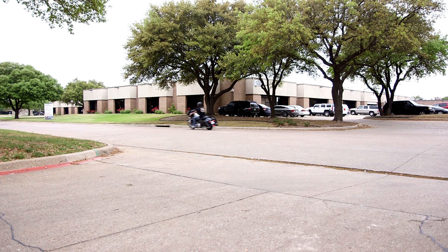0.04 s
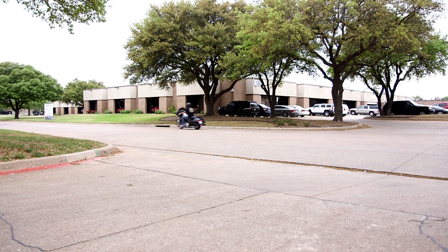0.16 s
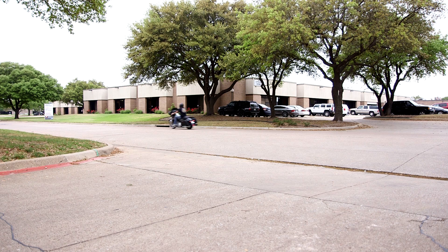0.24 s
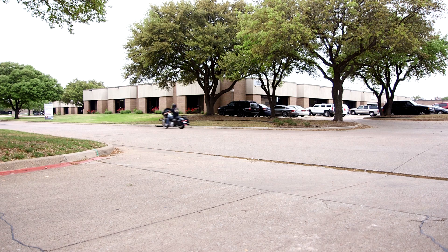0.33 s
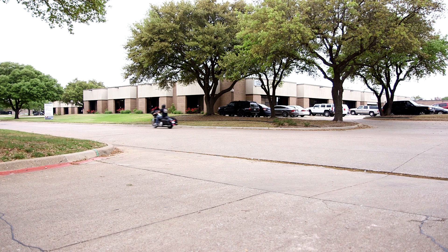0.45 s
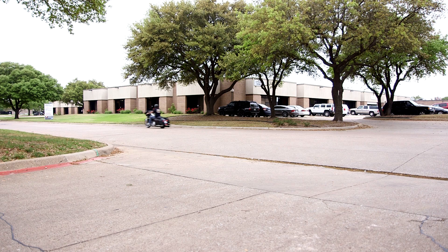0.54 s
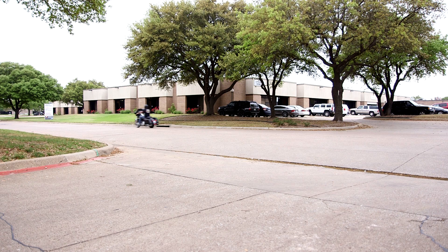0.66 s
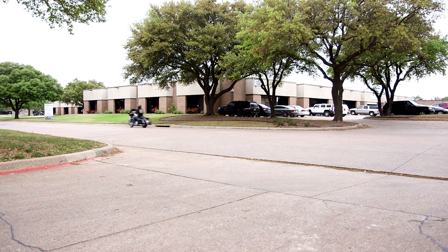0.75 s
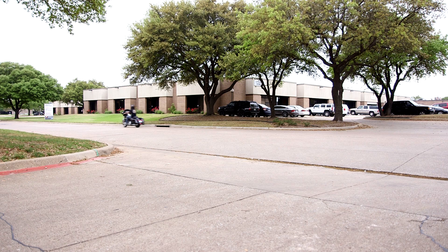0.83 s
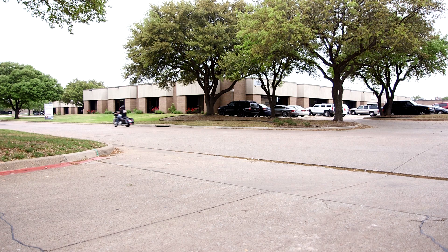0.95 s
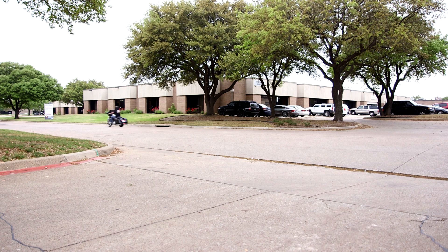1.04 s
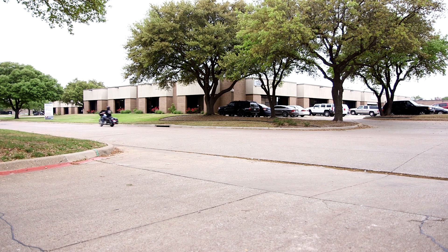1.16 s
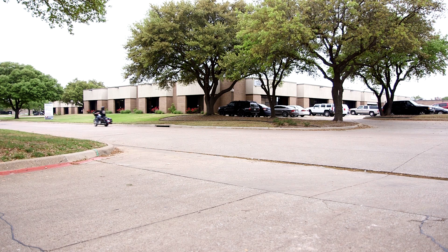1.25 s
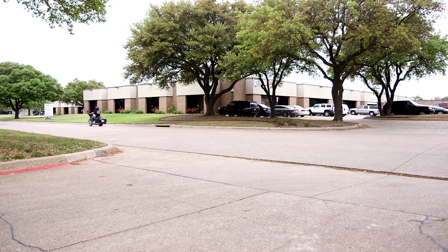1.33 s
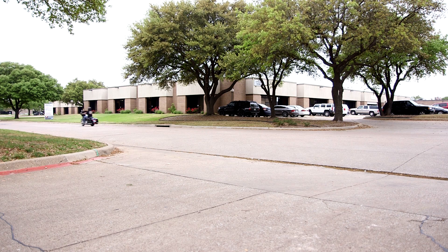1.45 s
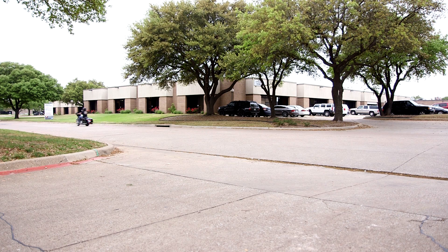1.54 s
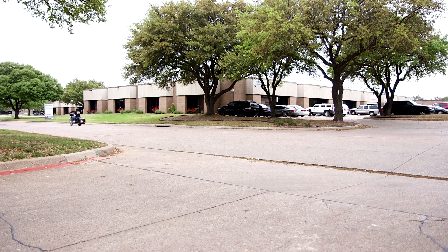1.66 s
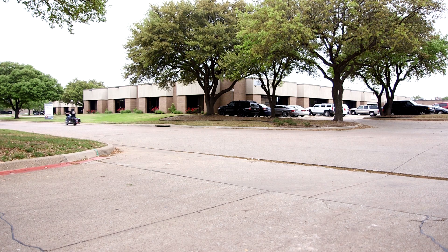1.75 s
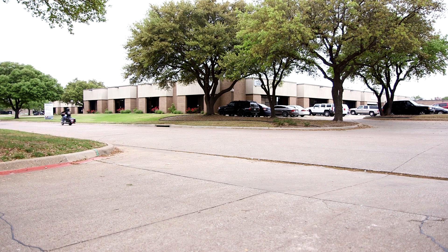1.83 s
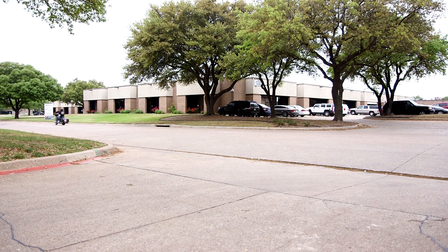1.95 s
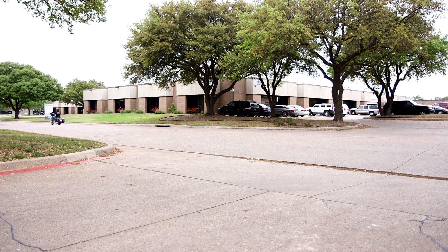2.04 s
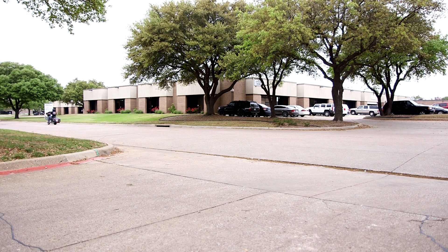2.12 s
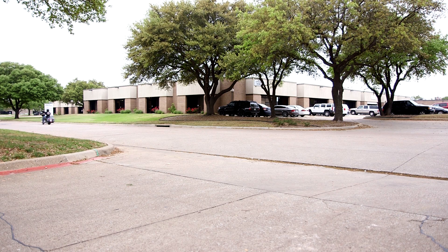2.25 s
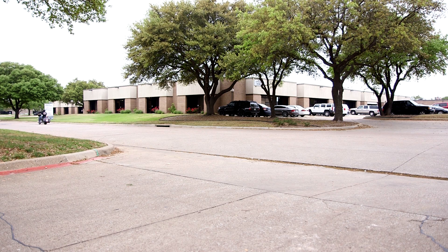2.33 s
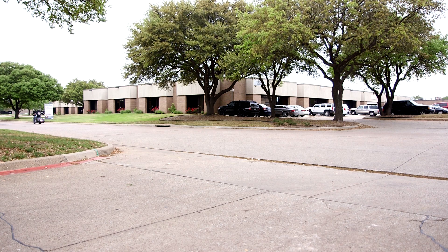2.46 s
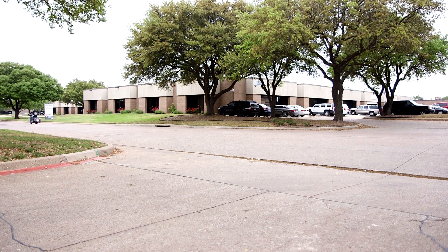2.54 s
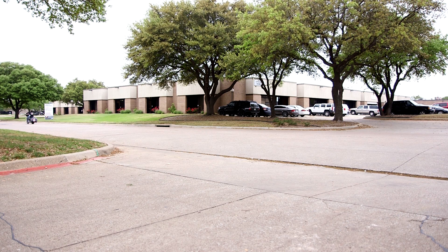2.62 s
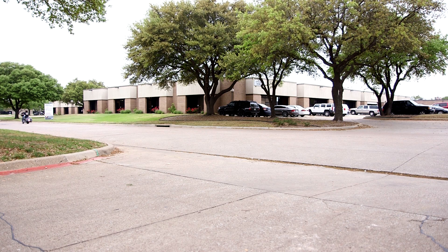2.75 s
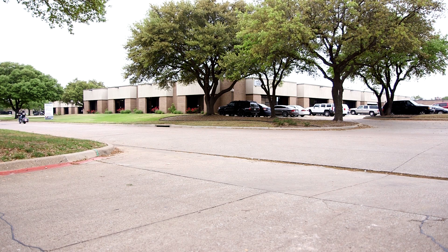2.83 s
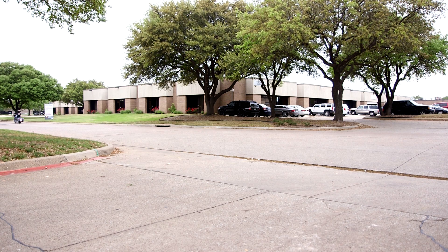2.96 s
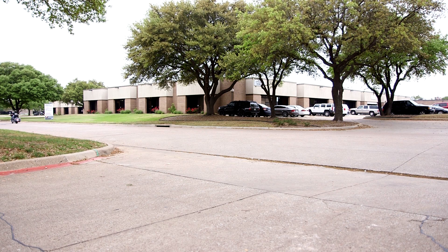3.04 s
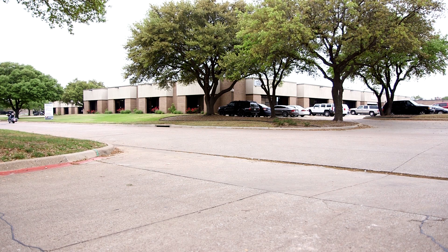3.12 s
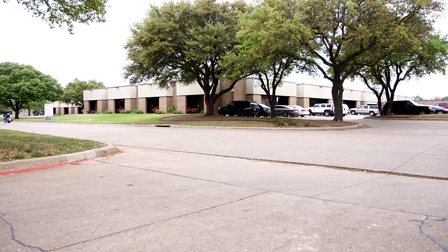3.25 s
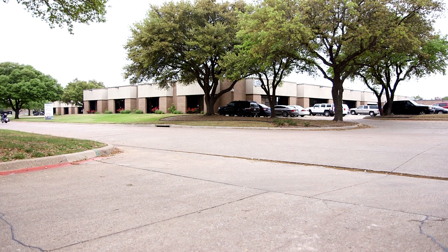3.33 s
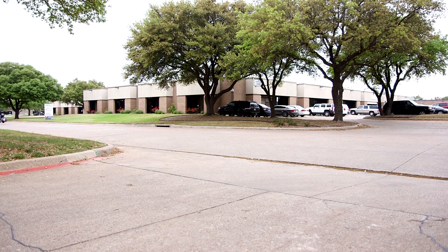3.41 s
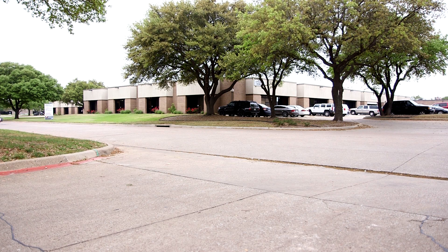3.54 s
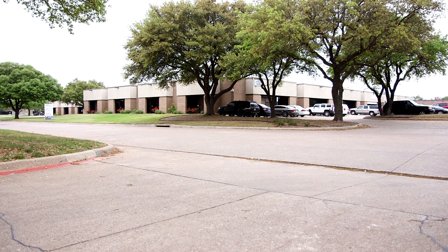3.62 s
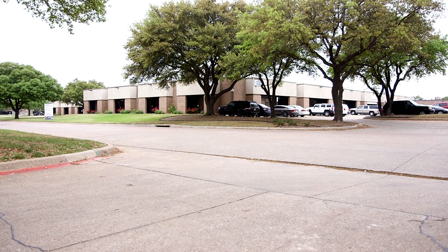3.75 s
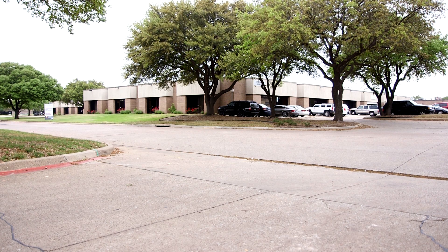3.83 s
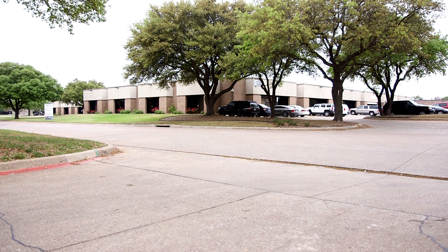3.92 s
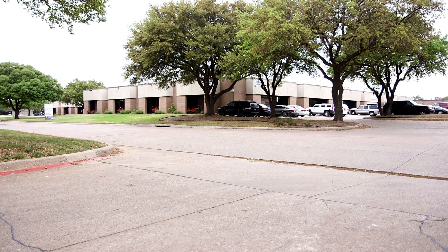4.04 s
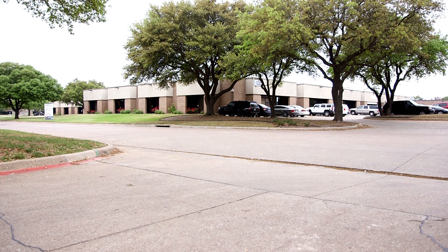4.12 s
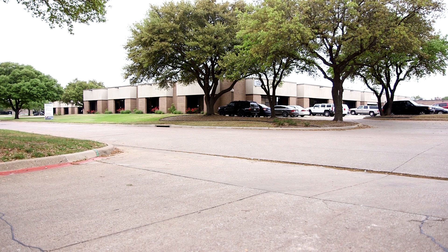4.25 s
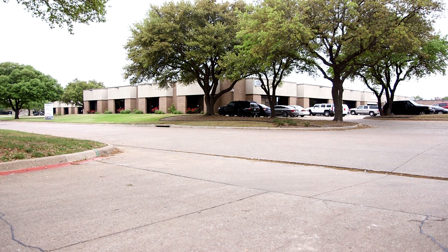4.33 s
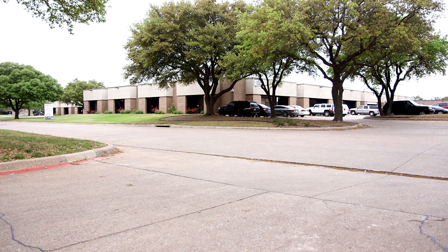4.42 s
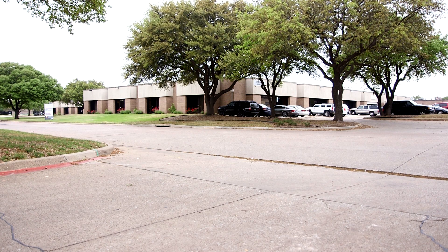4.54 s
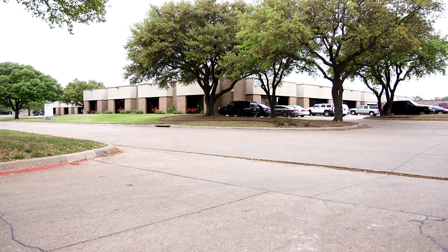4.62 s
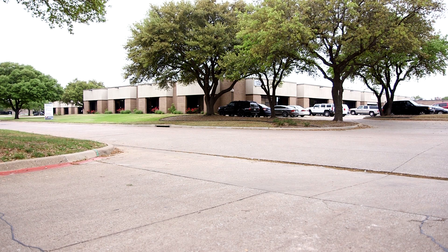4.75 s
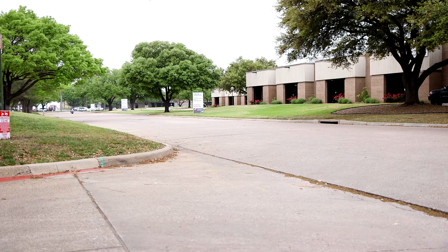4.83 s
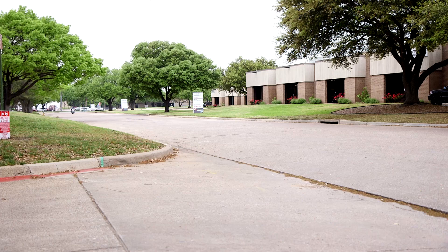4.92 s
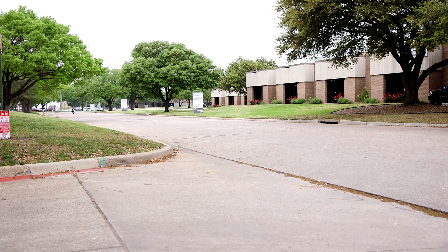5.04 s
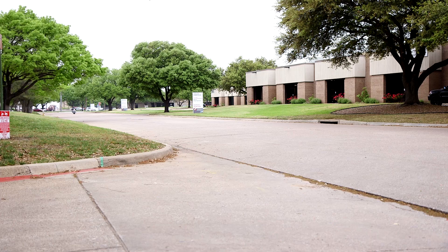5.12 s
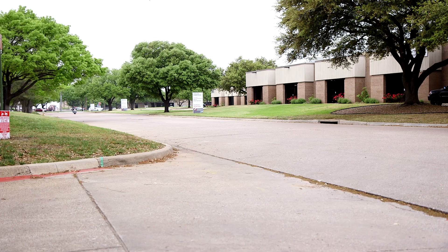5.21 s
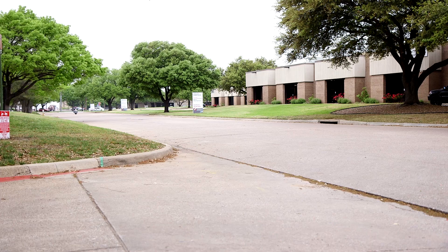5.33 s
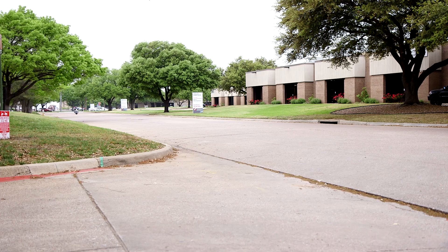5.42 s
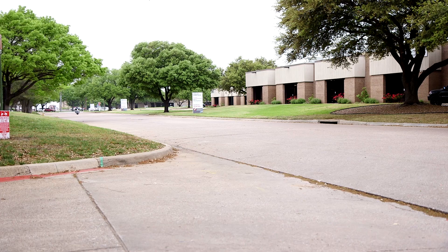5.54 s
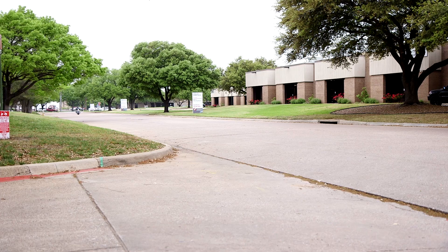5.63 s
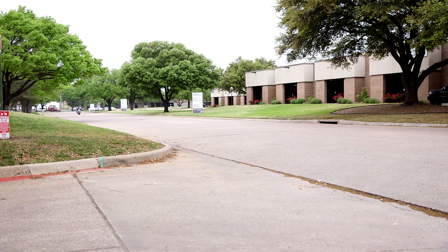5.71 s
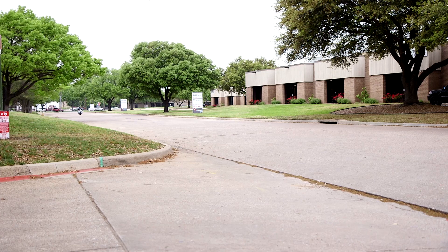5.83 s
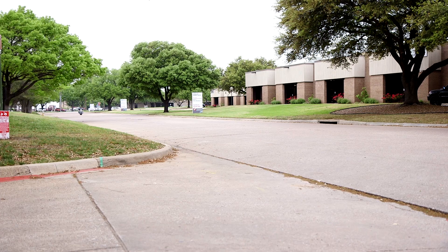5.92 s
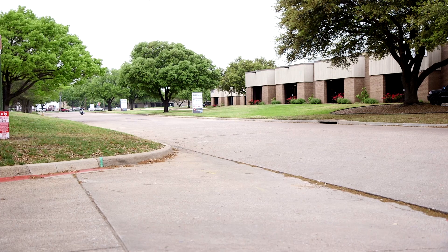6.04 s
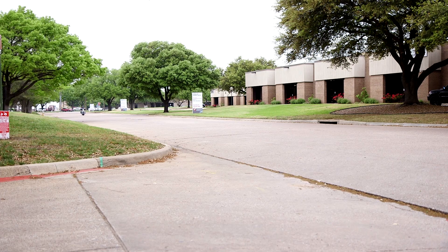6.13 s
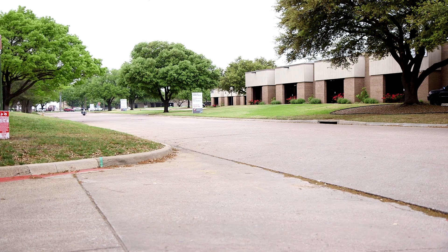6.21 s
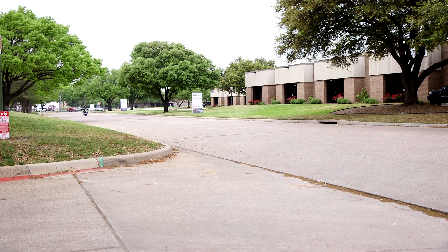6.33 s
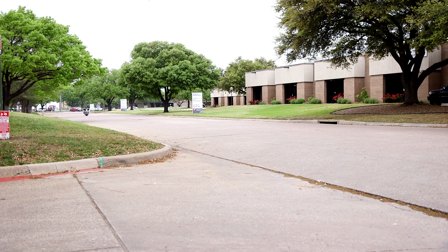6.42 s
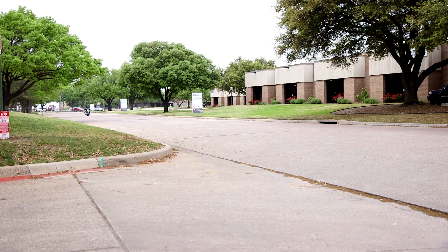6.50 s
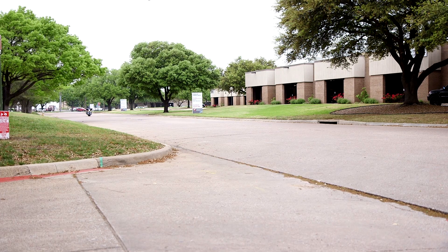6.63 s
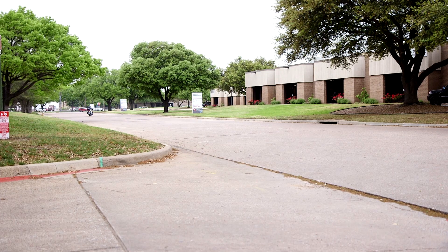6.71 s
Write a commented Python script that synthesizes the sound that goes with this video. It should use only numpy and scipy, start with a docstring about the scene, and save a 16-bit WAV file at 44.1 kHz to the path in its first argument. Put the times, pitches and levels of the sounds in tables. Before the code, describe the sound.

A big twin-cylinder motorcycle accelerates past with a deep, thumping, rasping exhaust. It shifts gear and winds up again as it moves away, with sharp crackles. Then it coasts with short throttle blips and low pops, and far down the road it opens up into a steady, wavering drone. The microphone stays at the side of an open street, with light echoes and faint distant traffic.

```python
"""An office street: a big V-twin motorcycle with open mufflers pulls away, winds up, shifts, winds up
again and coasts with blips and afterfire. Then, far down the road amid traffic, it opens up on its way
back, its drone beating slowly against a building's echo. Each firing thumps the exhaust pipes and spits
gas; throttle, engine speed and distance set the levels; trees and walls scatter the sound."""
import sys
import numpy as np
from scipy import signal
from scipy.fft import rfft, irfft
from scipy.io import wavfile
from scipy.ndimage import uniform_filter1d

SR = 44100
rng = np.random.default_rng(int(sys.argv[2]) if len(sys.argv) > 2 else 0)


def materialize(psi):
    """Save the field psi as 16-bit PCM at rate SR to the path in sys.argv[1].

    A 1-D psi becomes a single channel; in a 2-D psi each row is a channel.
    """
    bounded = np.clip(np.atleast_2d(psi).T, -1, 1)
    quanta = np.round(bounded * 32767).astype(np.int16)
    wavfile.write(sys.argv[1], SR, quanta)


N = 298557
TIME_S = np.arange(N) / SR

# engine speed through two gears and the coast: (time [s], four-stroke cycle rate [Hz])
SPEED_LEAVING = [(0, 20.64), (1.24, 25.12), (1.42, 21.44), (1.56, 17.31), (1.7, 19.1), (1.83, 17.74),
                 (1.97, 18.73), (2.3, 19.31), (3.1, 22.76), (3.88, 25.67), (4.05, 21.96), (4.3, 18.87),
                 (5.3, 20.09)]


def from_db(db):
    return 10 ** (np.asarray(db) / 20)


def rms_one(x):
    return x / np.sqrt(np.mean(x ** 2) + 1e-20)


def in_time(rows):
    """Columns of a curve at every sample."""
    time_s, *columns = np.transpose(rows)
    return [np.interp(TIME_S, time_s, column) for column in columns]


def swell(at_s, sigma_s):
    return np.exp(-.5 * ((TIME_S - at_s) / sigma_s) ** 2)


def evened(x, samples=4400):
    """Running level held at 1; single firings keep their shape."""
    power = uniform_filter1d(uniform_filter1d(x ** 2, samples), samples)
    return x / np.sqrt(np.abs(power) + 1e-12)


def butter(x, hz, kind):
    return signal.sosfilt(signal.butter(2, hz, kind, fs=SR, output="sos"), x + 1e-18)


def noise(spectrum):
    """Coloured noise, rms 1."""
    hz, db = np.transpose(spectrum)
    bins_hz = np.arange(N // 2 + 1) * SR / N
    gain = from_db(np.interp(np.log(bins_hz + 1), np.log(hz), db))
    return rms_one(irfft(rfft(rng.standard_normal(N)) * gain, N))


def decay(x, tau_s):
    """Each click becomes an exponential tail."""
    return signal.lfilter([1], [1, -np.exp(-1 / (tau_s * SR))], x + 1e-18)


def resonate(x, modes):
    """Parallel resonances: (frequency [Hz], width [Hz], gain [dB])."""
    out = 0
    for hz, width_hz, db in modes:
        r = np.exp(-np.pi * width_hz / SR)
        poles = [1, -2 * r * np.cos(2 * np.pi * hz / SR), r * r]
        out += from_db(db) * (1 - r * r) / 2 * signal.lfilter([1, 0, -1], poles, x + 1e-18)
    return out


def gliding(x, hz, width_hz):
    """A steep resonance whose centre moves."""
    turn = np.exp(2j * np.pi * np.cumsum(hz) / SR)
    r = np.exp(-np.pi * width_hz / SR)
    return np.real(turn * signal.lfilter([1 - r], [1, -2 * r, r * r], x / turn + 1e-18))


def scattered(x, wet_db, t60_s):
    """Trees and walls add a diffuse tail."""
    t = TIME_S[:SR]
    tail = rng.standard_normal(SR) * from_db(-60 * t / t60_s) * (t > .015)
    return x + from_db(wet_db) * signal.fftconvolve(x, tail / np.linalg.norm(tail))[:N]


def throttle(empty_s=.029):
    """Opening 0-1: each twist rises, holds and dies as the pipes empty."""
    # pulls and blips: (opens [s], shuts [s], opening [0-1], rise [s])
    twists = [(-.2, 1.48, 1, .04), (1.6, 3.88, 1, .04), (3.975, 4.03, .6, .012), (4.36, 4.47, .8, .03),
              (4.66, 4.83, .9, .07), (4.94, 5.65, .5, .03), (5.5, 6.9, 1, .14)]
    return np.max([opening * (1 - np.exp(-np.maximum(TIME_S - opens_s, 0) / rise_s))
                   * np.exp(-np.maximum(TIME_S - shuts_s, 0) / empty_s)
                   for opens_s, shuts_s, opening, rise_s in twists], axis=0)


def firings(speed, start_cycle, uneven, rear_db, spread_db, jitter_s):
    """Clicks of two cylinders, 315 degrees apart; uneven (0-1) scales spread and jitter."""
    cycles = start_cycle + np.cumsum(in_time(speed)[0]) / SR
    clicks = np.zeros((2, N))
    for cylinder, offset, db in zip(clicks, (0, 315 / 720), (0, rear_db)):
        due = np.flatnonzero(np.diff(np.floor(cycles - offset)) > 0)
        size, late = rng.standard_normal((len(due), 2)).T
        fired = np.clip(due + late * uneven[due] * jitter_s * SR, 0, N - 1).astype(int)
        cylinder[fired] = from_db(db + spread_db * uneven[due] * np.minimum(size, 1))
    return clicks


def engine(shut, far, pulling=.016, coasting=.45, settle_s=.11):
    """Firings of the departure fade into those of the return; uneven off load."""
    # engine speed far away: (time [s], cycle rate [Hz])
    speed_returning = [(4.7, 28.31), (5.2, 28.53), (5.5, 29.08), (5.75, 29.22), (6.1, 28.83), (6.45, 28.7),
                       (6.77, 28.63)]
    uneven = pulling + (coasting - pulling) * decay(shut, settle_s) / (settle_s * SR)
    leaving = firings(SPEED_LEAVING, -.324, uneven, rear_db=0, spread_db=4.5, jitter_s=.0015)
    returning = firings(speed_returning, .0974, uneven, rear_db=-4, spread_db=-9, jitter_s=.0013)
    leaving[1, 0] = .8  # already running
    return np.sqrt(1 - far) * leaving, np.sqrt(far) * returning


def turbulent(clicks, rough=.007):
    """A puff of turbulence follows each pulse."""
    return clicks + rough * decay(clicks, .014) * rng.standard_normal(N)


def pipes(thumps, direction):
    """Each cylinder's blow-down rings its own pipe, heard from one direction."""
    # pipe modes: (frequency [Hz], width [Hz], then signed gain [linear] for each direction:
    # 0 side-on, 1 turning away, 2 rear quarter, 3 behind, 4 head-on)
    front_modes = [(107.0, 16.0, -2.0, -1.2, -1.01, 0.54, -1.62),
                   (113.0, 16.0, 0.36, 0.61, -0.42, -1.48, 1.6),
                   (148.0, 16.0, 0.45, -0.33, 0.19, -0.15, -0.85),
                   (174.0, 63.0, 0.02, 0.29, -0.11, 0.11, 0.09),
                   (252.0, 70.0, 0.18, -0.06, 0.14, 0.05, 0.03),
                   (340.0, 70.0, 0.04, -0.04, 0.07, 0.06, -0.03),
                   (416.0, 24.0, -0.05, 0.05, -0.06, -0.01, -0.02)]
    rear_modes = [(103.0, 26.0, -0.41, -0.93, -0.53, 0.27, -0.25),
                  (144.0, 70.0, -0.31, -0.1, -0.21, -0.46, -0.1),
                  (185.0, 25.0, 0.67, 0.22, 0.2, 0.42, 0.02), (246.0, 39.0, 0.04, 0.24, 0.06, 0.17, 0.07),
                  (282.0, 16.0, 0.31, -0.11, 0.06, -0.15, -0.04),
                  (306.0, 70.0, 0.12, 0.08, 0.06, 0.03, 0.05),
                  (396.0, 66.0, 0.07, -0.09, 0.04, 0.025, -0.03)]
    return sum(gains[direction] * resonate(cylinder, [(hz, width_hz, 0)])
               for cylinder, modes in zip(thumps, (front_modes, rear_modes))
               for hz, width_hz, *gains in modes)


def chambers(going, coming, shut):
    """Mufflers ring on: hollow as the bike swings away, rumbling shut or labouring, howling head-on."""
    # chamber modes: (frequency [Hz], width [Hz], gain [dB])
    hollow = [(404.9, 8.3, -27)]
    rumble = [(76.7, 8.2, -2)]
    howl = [(293, 41, -31), (350.6, 22, -26.5), (478, 53, -32)]
    labour = 1.1 * swell(1.75, .29)
    rung = resonate(going * from_db(15.5 * swell(2.07, .3)), hollow)
    rung += resonate(going * np.maximum(shut, labour), rumble)
    rung += resonate(coming, howl)
    return scattered(rung, wet_db=-2, t60_s=.3)


def boom(leaving, returning, shut, shifting, gain_db=46, duck_db=-3):
    """The deep pipe note changes with heading; the wall's echo sweeps notches through it."""
    # thump strength from load and distance: (time [s], relative level [dB])
    push = [(0, -4.5), (1.24, -6), (1.47, -6), (1.52, -6.5), (1.59, -10.5), (1.65, -5), (1.8, -3.5),
            (2.0, -5.5), (3.87, -5.5), (3.92, -12.5), (4.28, -16), (4.45, -7.5), (4.6, -15), (4.78, -6),
            (4.92, -10.5), (5.2, -9), (5.53, -10), (5.78, -5.5), (6.1, -6), (6.77, -4)]
    # the bike swings away, then turns: (time [s], direction [0 side-on to 3 behind])
    headings = [(1.45, 0), (1.62, 1), (2.1, 1), (2.9, 2), (3.75, 3), (4.1, 3), (4.45, 1)]
    # sound arriving via trees and walls: (time [s], share [0-1])
    indirect = [(3.9, 0), (4.7, 0.61), (5.2, 0.4), (5.6, 0.28)]
    # building echo: (time [s], delay [ms], strength [0-1])
    wall = [(4.9, 4.2, 0), (5.2, 4.18, .41), (5.5, 4.13, .34), (5.8, 4.96, .53), (6.1, 7.29, .38),
            (6.4, 10.31, .48), (6.75, 9.85, .06)]
    drive = from_db(in_time(push)[0] + duck_db * shifting)
    going, coming = turbulent(leaving * drive), turbulent(returning * drive)
    heading, = in_time(headings)
    note = sum(np.maximum(1 - abs(heading - k), 0) * pipes(going, k) for k in range(4))
    note += pipes(coming, direction=4)
    note += chambers(going.sum(axis=0), coming.sum(axis=0), shut)
    note = butter(butter(note, 65, "high"), 520, "low")
    note = signal.sosfiltfilt(signal.butter(4, 560, fs=SR, output="sos"), note)
    share, = in_time(indirect)
    diffuse = scattered(note, wet_db=0, t60_s=.4) - note
    note = np.sqrt(1 - share) * note + np.sqrt(share) * diffuse
    delay_ms, strength = in_time(wall)
    echo = strength * np.interp(TIME_S - delay_ms / 1000, TIME_S, note)
    return from_db(gain_db) * (note + echo)


def bark(clicks, trim_db=-1):
    """Steep pulse fronts ring two wandering upper pipe modes."""
    # modes: (time [s], lower level [dB], lower pitch [Hz], upper level [dB], upper pitch [Hz])
    modes = [(0.0, -37, 706, -35, 930), (0.14, -33, 663, -35, 890), (0.81, -32.5, 700, -35, 912.5),
             (1.44, -44, 676, -41.5, 910), (1.54, -43, 650, -45, 950), (1.58, -56, 656, -62, 927),
             (1.68, -39.5, 704, -45.5, 923), (2.13, -43.5, 675, -45.5, 890), (2.33, -45, 667, -59, 900),
             (2.38, -42.5, 670, -43.5, 883), (3.41, -49, 680, -54, 930), (3.68, -49, 657, -44, 910),
             (3.87, -46, 680, -46, 865), (3.93, -63, 675, -70, 947), (4.02, -51, 648, -58, 919),
             (4.3, -62, 685, -64, 928)]
    fronts = scattered(turbulent(clicks, rough=.004), wet_db=-2, t60_s=.18)
    low_db, low_hz, high_db, high_hz = in_time(modes)
    return sum(from_db(trim_db + db) * evened(gliding(fronts, hz, width_hz=153))
               for db, hz in ((low_db, low_hz), (high_db, high_hz)))


def cracks(clicks, tau_s=.0008, spread_db=2.5):
    """A tearing burst per firing, favouring other modes each time."""
    # pipe mouth: (frequency [Hz], width [Hz], gain [dB])
    modes = [(1820, 110, 7), (2930, 200, 7), (4460, 1030, 9.5), (5270, 1200, -18), (7200, 1700, -7),
             (11500, 3500, -9.5)]
    out = 0
    for mode in modes:
        strikes = clicks * from_db(spread_db * np.minimum(rng.standard_normal(N), 1.8))
        envelope = decay(decay(decay(strikes, tau_s), tau_s), tau_s)
        out += resonate(envelope * rng.standard_normal(N), [mode])
    return butter(out, 1300, "high")


def rasp(clicks, shut, far, drone_hz=21.6, drone_width_hz=1.05):
    """Gas rushes out after each firing; its front steepens into a crack."""
    # gas noise: (frequency [Hz], density [dB])
    spectrum = [(300, 0.5), (480, 6), (650, 6), (1000, 3), (1400, -0.5), (2000, -0.5), (2500, -5.5),
                (3300, -7.5), (4400, -4.5), (5600, -10), (8000, -16), (11500, -22), (16000, -42)]
    # brightness as the mufflers swing round: (time [s], treble [2.1 dB steps], crack level [dB])
    aim = [(0, -2.5, -8), (1.25, -1.5, -14), (1.8, 0, -6), (2.42, 2.5, -6.5), (3.1, 4.5, -15.5),
           (3.85, -1.5, -26), (4.25, -4, -23), (4.48, 4, -18), (4.85, 0, -22), (5.15, -9, -36),
           (6.77, -2.5, -15)]
    # distance loss: (time [s], gain [2.5 dB steps])
    path = [(0, -0.5), (.8, 0.5), (1.4, -1.03), (2.15, -4.5), (3.1, -4.5), (3.8, -3.5), (4.3, -7),
            (5.3, -8), (6.77, -7.5)]
    treble, crack_db = in_time(aim)
    rush = noise(spectrum) * (2.84 + rms_one(decay(decay(clicks, .0033), .0033)))
    gas = evened(evened(rush) + from_db(crack_db) * evened(cracks(clicks), samples=9000))
    dull = signal.sosfiltfilt(signal.butter(1, 6000, fs=SR, output="sos"), gas)
    aimed = dull + from_db(2.1 * treble) * (gas - dull)
    # louder where the cycle rate's fifth harmonic meets the pipe resonance
    drone = (1 - far) * np.exp(-.5 * ((in_time(SPEED_LEAVING)[0] - drone_hz) / drone_width_hz) ** 2)
    level_db = -32.5 - 3.5 * shut + 2.5 * in_time(path)[0] + 2 * drone
    return from_db(level_db) * scattered(aimed, wet_db=-11.5, t60_s=.82)


def street_air(level_db=-38):
    """Steady low rush of the street."""
    # air: (frequency [Hz], density [dB])
    spectrum = [(20, -20), (50, 14.5), (100, 8.5), (300, 9.5), (1000, -21.5), (2500, -29.5), (6000, -26),
                (15000, -54)]
    return from_db(level_db) * noise(spectrum)


def snaps(width_hz=1800, trim_db=-.5):
    """The hardest cracks: short bursts ring the pipe mouth."""
    # cracks: (time [s], peak before trim [dB], ring [Hz])
    events = [(0.178, -21.5, 4300), (0.2269, -23, 4030), (0.2713, -20, 4370), (1.752, -26, 4300),
              (1.8023, -29, 4850), (1.9135, -24.5, 4630), (1.9683, -26, 4510), (2.3361, -27, 4640),
              (2.3852, -27.5, 4150), (2.4139, -28, 6100), (2.584, -24.5, 4980), (2.8955, -26.5, 3760),
              (2.9856, -25, 4260), (3.0317, -25, 4990), (3.0935, -25, 4870)]
    out, t = np.zeros(N), TIME_S[:SR // 8]
    for at_s, db, hz in events:
        mode = [(hz, width_hz, 0)]
        burst = t * np.exp(-t / .00081) * rng.standard_normal(len(t))
        rung = resonate(resonate(burst, mode), mode)
        out[int(at_s * SR):][:len(t)] += from_db(trim_db + db) * rung / np.abs(rung).max()
    return out


def gear_change(front_clicks, from_s=1.275, to_s=1.485, level_db=-21.5, sag_hz_per_s=82):
    """The front cylinder booms alone and its note sags. Returns the note and its 0-1 gate."""
    gate = np.clip((TIME_S - from_s) / .01, 0, 1) * np.exp(-np.maximum(TIME_S - to_s, 0) / .036)
    hz = 120 - sag_hz_per_s * np.clip(TIME_S - from_s, 0, .5)
    return -from_db(level_db) * gate * evened(gliding(front_clicks, hz, width_hz=48)), gate


def metallic_ring(clicks, level_db=-42):
    """Gas bursts set the muffler ringing midway through second gear."""
    # muffler modes: (frequency [Hz], width [Hz], gain [dB])
    modes = [(2084, 230, 6.5), (2820, 840, -1)]
    strikes = clicks * from_db(3.5 * np.minimum(rng.standard_normal(N), 1.3))
    bursts = decay(strikes, .004) * rng.standard_normal(N)
    rung = scattered(resonate(bursts, modes), wet_db=-5, t60_s=.18)
    return from_db(level_db) * swell(2.98, .31) * evened(rung)


def traffic(level_db=-43.5, from_s=3.71, rise_s=1):
    """Distant traffic comes up as the bike recedes."""
    # rush: (frequency [Hz], density [dB])
    spectrum = [(300, 4), (900, 0.5), (1900, -5), (2600, -10.5), (4500, -14.5), (7000, -34), (14000, -56.5)]
    return from_db(level_db) * np.clip((TIME_S - from_s) / rise_s, 0, 1) * noise(spectrum)


def afterfire(rise_s=.0013, decay_s=.015):
    """Deep knocks in the exhaust during the coast."""
    # pops: (time [s], gain [dB], pitch [Hz])
    pops = [(3.9974, -9, 123), (4.039, -13, 158), (4.141, -17, 155), (4.25, -21.5, 201), (4.399, -16, 166),
            (4.62, -14, 125), (4.896, -21, 106), (4.963, -14.5, 113), (5.117, -19, 125)]
    out, t = np.zeros(N), TIME_S[:SR // 8]
    envelope = (1 - np.exp(-t / rise_s)) * np.exp(-t / decay_s)
    for at_s, db, hz in pops:
        out[int(at_s * SR):][:len(t)] += from_db(db) * envelope * np.sin(2 * np.pi * hz * t)
    return out


def hiss(clicks, level_db=-61):
    """The gas jets hiss as the bike turns, fluttering with the firings."""
    # jets: (frequency [Hz], density [dB])
    spectrum = [(3000, -30), (4800, 3), (7500, 0), (10000, -18), (15000, -31)]
    flutter = evened(1 + rms_one(decay(clicks, .005)))
    return from_db(level_db) * swell(4.6, .24) * noise(spectrum) * flutter


def scene(crack_lead_s=.002):
    """The exhaust, driven by the firings, over street air and traffic; mono."""
    shut = 1 - throttle()
    far = np.clip((TIME_S - 4.77) / .53, 0, 1)  # the distant return takes over
    leaving, returning = engine(shut, far)
    front, rear = leaving + returning
    pulses = np.roll(.83 * front + rear, -int(crack_lead_s * SR))  # ahead of the thumps
    shift_note, shifting = gear_change(leaving[0])
    bike = boom(leaving, returning, shut, shifting) + shift_note
    bike += scattered(snaps() + afterfire(), wet_db=-6, t60_s=.57)
    bike += bark(pulses) + rasp(pulses, shut, far) + hiss(pulses) + metallic_ring(pulses)
    return (bike + street_air() + traffic())[None]


def record(dry, cutoff_hz=15800):
    """Steep low-pass."""
    return signal.sosfilt(signal.ellip(10, .1, 90, cutoff_hz, fs=SR, output="sos"), dry)


dry = scene()
out = record(dry)
materialize(out)
```